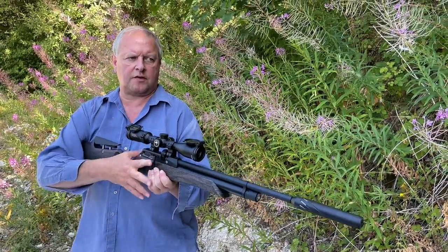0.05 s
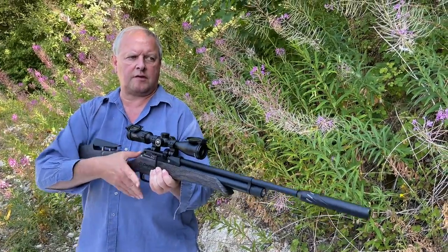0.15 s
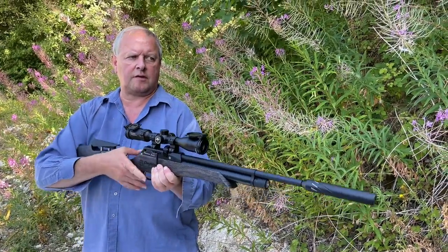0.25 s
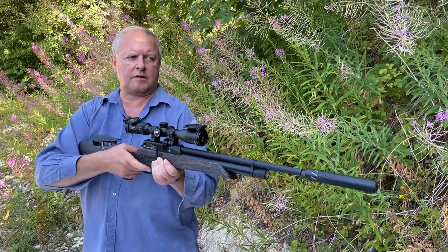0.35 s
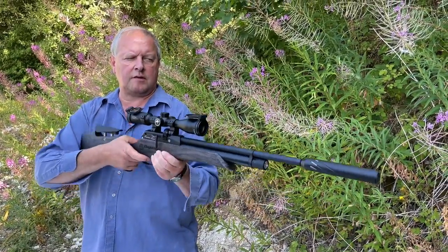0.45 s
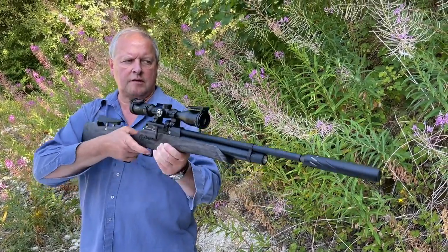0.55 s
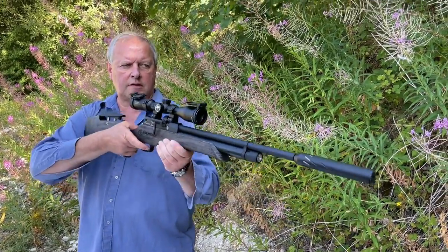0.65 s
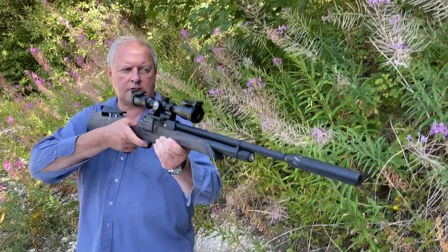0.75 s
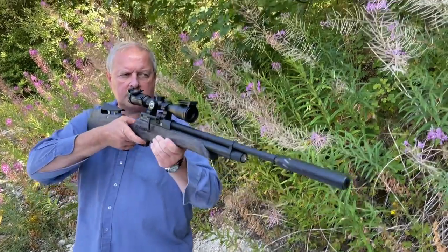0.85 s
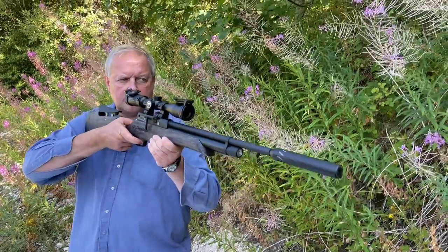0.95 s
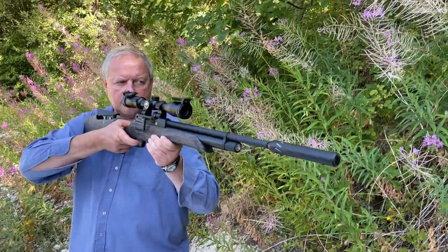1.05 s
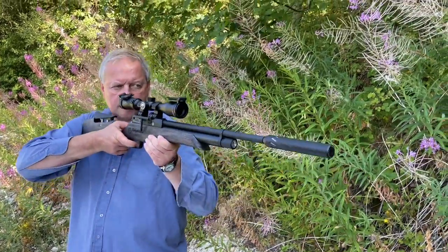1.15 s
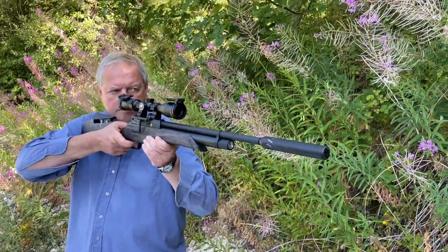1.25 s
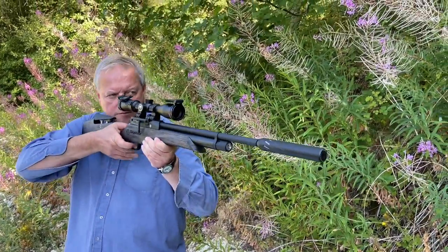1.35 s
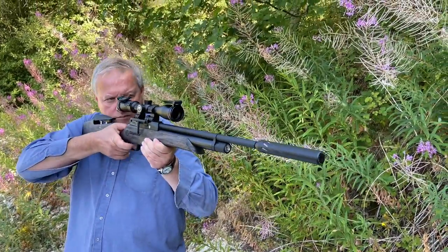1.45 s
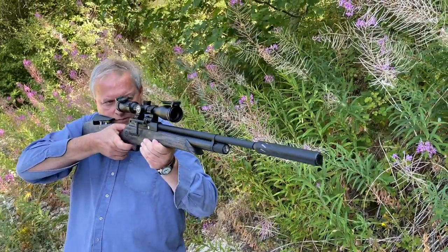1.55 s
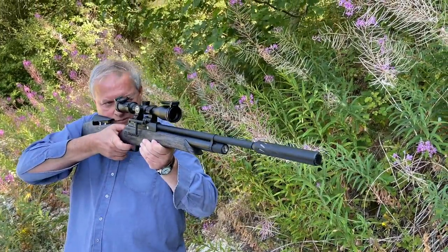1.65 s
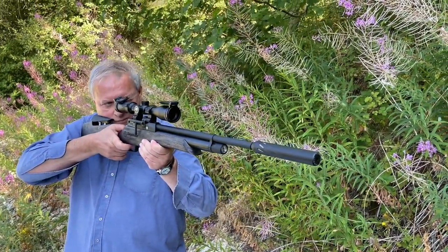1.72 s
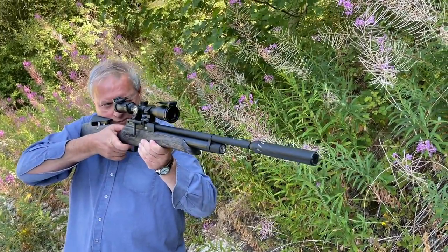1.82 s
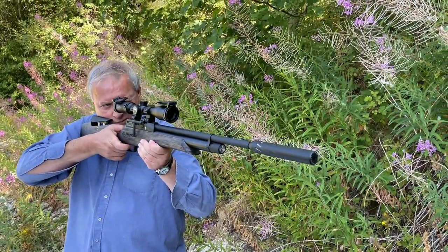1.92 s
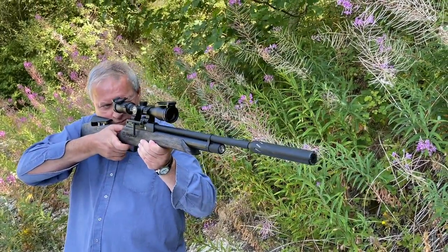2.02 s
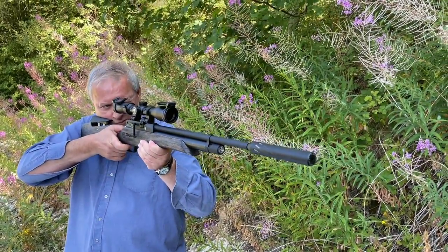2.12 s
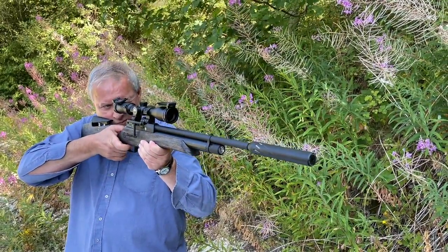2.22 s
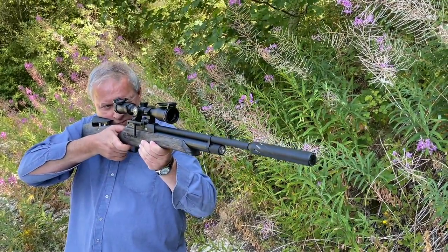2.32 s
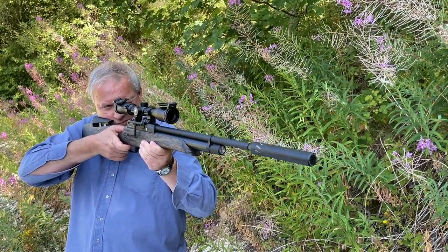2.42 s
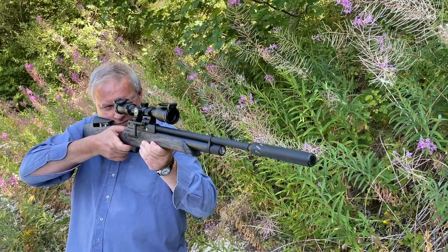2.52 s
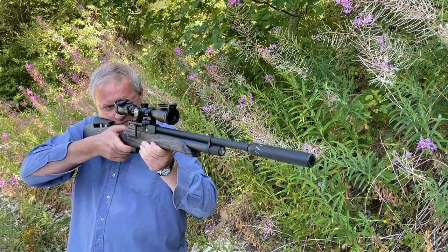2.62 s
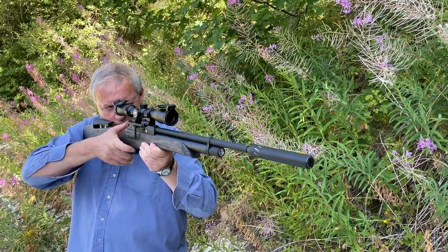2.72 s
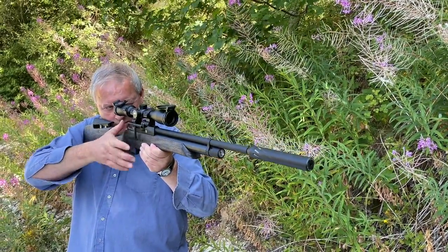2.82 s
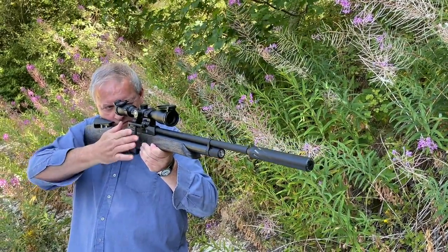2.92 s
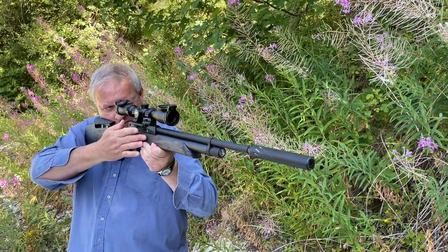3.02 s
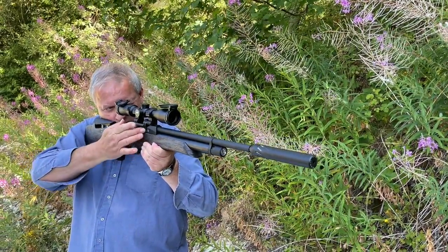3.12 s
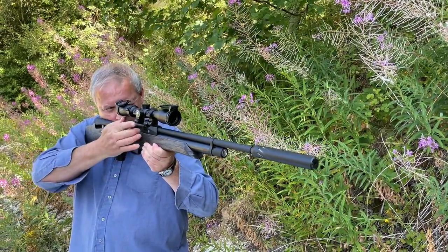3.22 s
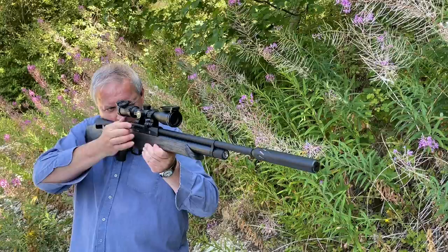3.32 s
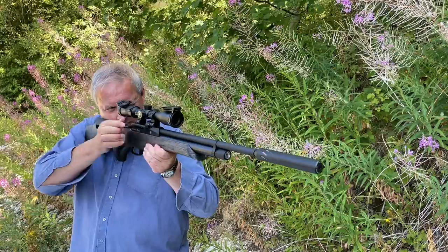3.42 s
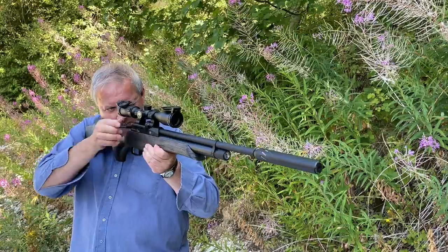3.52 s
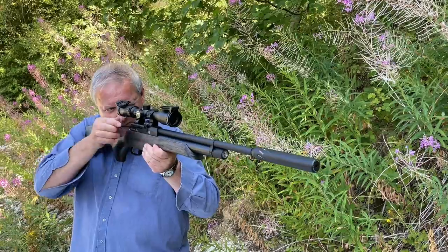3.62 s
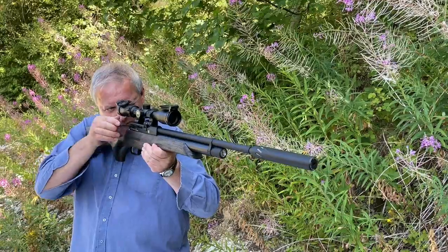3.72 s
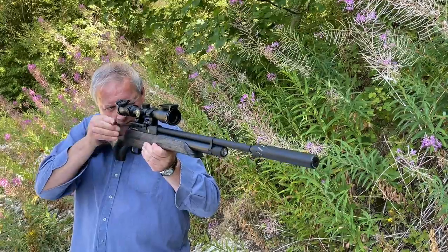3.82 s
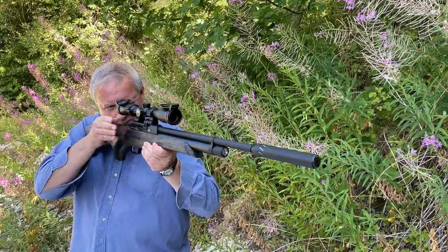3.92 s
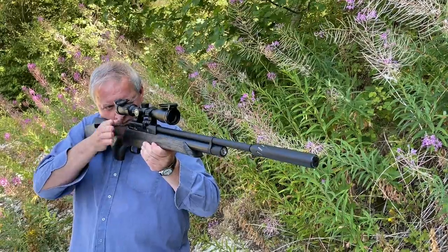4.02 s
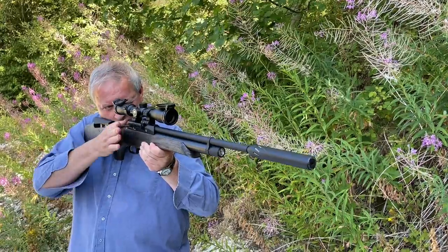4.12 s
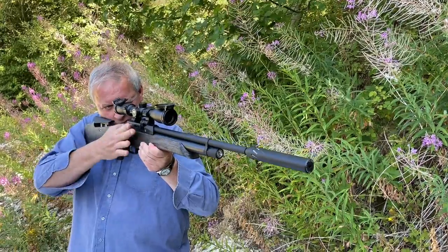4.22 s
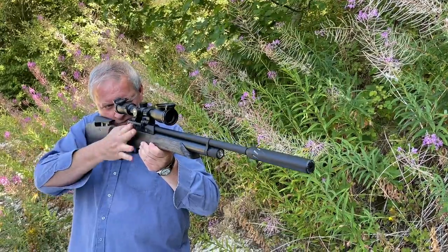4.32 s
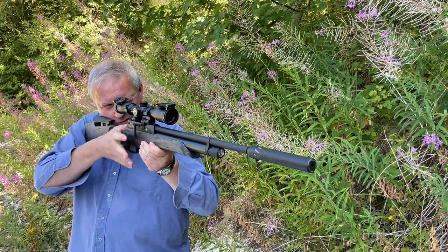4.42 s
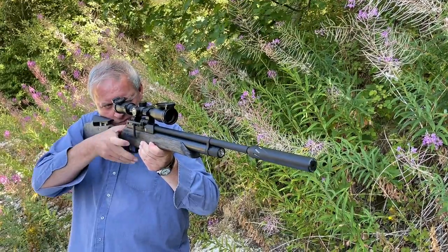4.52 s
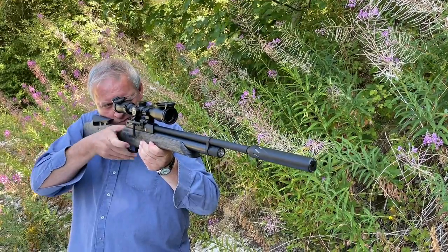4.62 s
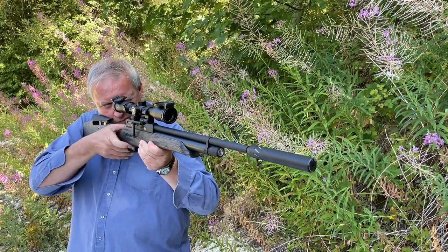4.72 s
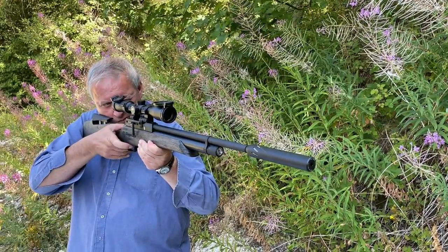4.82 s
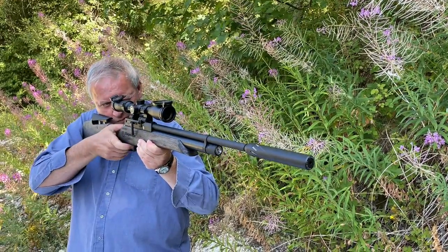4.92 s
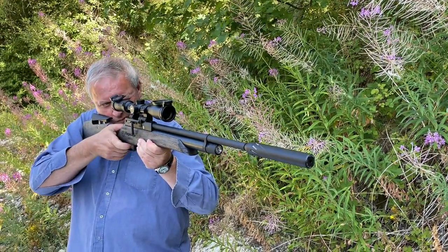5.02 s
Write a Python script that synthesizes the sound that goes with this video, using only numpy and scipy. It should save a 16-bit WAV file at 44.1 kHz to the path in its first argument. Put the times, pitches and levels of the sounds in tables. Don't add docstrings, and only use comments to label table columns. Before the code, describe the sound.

A hard steel clack opens, ringing briefly, then a dull bump and faint sleeve rustles as an air rifle is shouldered. After a quiet pause comes one very loud, overloaded burst of air with a short leafy echo. Then lever scrapes and sharp metallic knocks follow, ending in a firm snap. Close mono microphone outdoors, light wind rumble, hiss and a far engine hum.

```python
import sys
import numpy as np
from scipy import signal
from scipy.io import wavfile
from scipy.ndimage import uniform_filter1d

SR = 44100
rng = np.random.default_rng(int(sys.argv[2]) if len(sys.argv) > 2 else 0)


def output_pcm(signal):
    pcm = np.clip(np.atleast_2d(signal).T, -1, 1) * 32767
    wavfile.write(sys.argv[1], SR, np.round(pcm).astype(np.int16))


def nominal_scale(level):
    x = np.asarray(level, float) / 20
    return 10 ** x


N = 223099
T = np.arange(N) / SR


def rms_one(x):
    return x / np.sqrt(np.mean(x ** 2) + 1e-20)


def in_time(rows, silent_db=-110):
    s, level_db = np.transpose(rows)
    s = np.r_[s[0] - 0.04, s, s[-1] + 0.04]
    return np.interp(T, s, np.r_[silent_db, level_db, silent_db])


def at_hz(points, hz):
    points_hz, values = np.array(points).T
    return np.interp(np.log(hz), np.log(points_hz), values)


def band(x, low_hz, high_hz):
    sos = signal.butter(2, [low_hz, high_hz], "band", fs=SR, output="sos")
    return signal.sosfilt(sos, x + 1e-18)


def drift(rate_hz):
    r = np.exp(-80 * np.pi * rate_hz / SR)
    white = rng.standard_normal(N // 40 + 2002)
    slow = signal.lfilter([1], [1, -2 * r, r * r], white)[2000:]
    return np.interp(np.arange(N) / 40, np.arange(len(slow)), rms_one(slow))


def ring(force, hz, t60_s):
    r = nominal_scale(-60 / (t60_s * SR))
    w = 2 * np.pi * hz / SR
    return signal.lfilter([0, np.sin(w)], [1, -2 * r * np.cos(w), r * r], force + 1e-18)


def noise_bands(size):
    edges_hz = 20 * 2 ** np.arange(0, 10.1, 0.5)
    white = rng.standard_normal((2, size + 4000))
    out = []
    for k, (low_hz, high_hz) in enumerate(zip(edges_hz, edges_hz[1:])):
        noise = band(white[k % 2], low_hz, high_hz)[4000:]
        out.append((np.sqrt(low_hz * high_hz), noise))
    return out


def burst(after_s, rise_s, t60_s):
    return np.where(after_s < 0, np.exp(after_s / rise_s), nominal_scale(-60 * np.maximum(after_s, 0) / t60_s))


def coloured(colour_db, level_db, hard_db):
    return [level_db + db + hard_db * (part - 1) for part, db in enumerate(colour_db)]


# (frequency [Hz], level [dB])
AIR_COLOUR = [(100, 3), (250, 6), (500, 2.5), (1000, 2), (2000, -5), (4000, -8), (8000, -8.5), (16000, -14)]
# (frequency [Hz], density [dB per Hz])
WIND_COLOUR = [(20, 11.5), (34, -14.5), (50, -7), (70, -11.5), (100, -17), (140, -22), (200, -33),
               (400, -50)]
# (time [s], level [dB])
GUST = [(0.0, -52.5), (0.1, -47), (0.49, -47), (0.8, -43), (1.59, -48.5), (2.16, -46.5), (2.31, -48.5),
        (3.21, -48), (3.28, -47), (4.0, -49.5), (4.32, -45), (4.78, -50), (5.06, -51.5)]


def air():
    gust_db = in_time(GUST)
    hiss, wind, together = 0, 0, drift(5.3)
    for hz, noise in noise_bands(N):
        if hz > 100:
            hiss = hiss + noise * nominal_scale(at_hz(AIR_COLOUR, hz) + 0.32 * drift(3))
        if hz < 400:
            wind = wind + noise * nominal_scale(at_hz(WIND_COLOUR, hz) + 1.2 * together + 3 * drift(15))
    hum_hz, hum_width_hz, hum_db = 55, 18, -2
    hum = band(rng.standard_normal(N), hum_hz - hum_width_hz / 2, hum_hz + hum_width_hz / 2)
    hiss_db, wind_db = -65, -2.5
    return nominal_scale(hiss_db) * rms_one(hiss) + nominal_scale(gust_db + wind_db) * (rms_one(wind) + nominal_scale(hum_db) * rms_one(hum))


# (time [s], second order level [dB])
ENGINE_LOAD = [(0.0, -63.5), (0.31, -61.5), (0.45, -67.5), (0.97, -80), (1.38, -69), (2.1, -73),
               (2.24, -63.5), (2.93, -65), (3.04, -70), (3.8, -67.5), (4.06, -59.5), (4.42, -55.5),
               (4.8, -67.5), (5.06, -70)]


def engine():
    load_db = in_time(ENGINE_LOAD)
    swing_db = load_db - load_db.mean()
    phase = 2 * np.pi * np.cumsum(82.3 * (1 + 0.0022 * drift(1.0))) / SR
    out = 0
    # order, level at mean load [dB], share of the swing
    for order, db, follows in [(1, -67.5, 0.092), (2, -65, 0.98), (3, -72.5, 0.35)]:
        level_db = db + follows * swing_db + 0.83 * drift(0.97)
        out = out + np.sqrt(2) * nominal_scale(level_db) * np.sin(order * phase)
    return out


# (peak time [s], level [dB], brightness [dB], swell [s], fade [s])
SLEEVE_RUBS = [
    (0.501, -71.5, -1, 0.093, 0.14),
    (0.65, -59, -2, 0.046, 0.041),
    (0.93, -70, -12, 0.094, 0.085),
    (1.06, -62.5, -14, 0.036, 0.042),
]


def sleeves():
    dull, bright = 0, 0
    for s, db, bright_db, swell_s, fade_s in SLEEVE_RUBS:
        rub = nominal_scale(db) * np.exp(-((T - s) / np.where(T < s, swell_s, fade_s)) ** 2)
        dull = dull + rub
        bright = bright + rub * nominal_scale(bright_db)
    noise = rng.standard_normal((2, N)) * nominal_scale(1.05 * drift(60))
    return dull * rms_one(band(noise[0], 900, 3500)) + bright * rms_one(band(noise[1], 5600, 11500))


# (time [s], peak [dB], pitch [Hz])
BUMPS = [
    (0.211, -40, 113.3),
    (0.899, -50.5, 98.8),
    (1.49, -46, 110.8),
    (3.511, -57.5, 454),
    (3.548, -37, 100.9),
]


def bumps():
    return sum(nominal_scale(db) * np.exp(-((T - s) / 0.007) ** 2) * np.sin(2 * np.pi * hz * (T - s))
               for s, db, hz in BUMPS)


# (time [s], level [dB], lowest mode share [dB])
STOCK_BLOWS = [
    (0.003, -35, -1),
    (3.447, -42, -19),
    (3.647, -35.5, -12.5),
    (3.862, -41, -22),
    (3.872, -43.5, -22),
    (3.923, -57.5, -22),
    (4.233, -36, -8.5),
]
# (frequency [Hz], level [dB], t60 [s])
STOCK_MODES = [(373, 6.5, 0.11), (500, -5.5, 0.025), (665, 7, 0.02), (740, 3, 0.06), (1049, 2.5, .07),
               (1588, -1.5, 0.083), (2850, 0, .06)]


def stock():
    force = np.zeros((2, N))
    for s, db, low_db in STOCK_BLOWS:
        force[:, round(s * SR)] = nominal_scale(db + low_db), nominal_scale(db)
    force[1] = band(force[1], 330, 5000)
    return sum(nominal_scale(db) * ring(force[int(k > 0)], hz, t60_s)
               for k, (hz, db, t60_s) in enumerate(STOCK_MODES))


# (time [s], level [dB])
TUBE_BLOWS = [
    (0.003, -37),
    (0.047, -39.5),
    (0.066, -49),
    (0.112, -57.5),
]
# (frequency [Hz], level [dB], t60 [s])
TUBE_MODES = [(800, -7, .07), (1600, -1, .09), (3390, -8, .05), (4810, -4, .03), (5250, -4, .03)]


def tube():
    force = np.zeros((len(TUBE_MODES), N))
    signs = rng.choice([-1, 1], (len(TUBE_MODES), len(TUBE_BLOWS)))
    at = [round(s * SR) for s, db in TUBE_BLOWS]
    force[:, at] = nominal_scale([db for s, db in TUBE_BLOWS]) * signs
    return sum(nominal_scale(db) * ring(f, hz, t60_s) for f, (hz, db, t60_s) in zip(force, TUBE_MODES))


# (frequency [Hz], level [dB], t60 [s])
ACTION_MODES = [(1300, 0, .015), (1620, 5, .02), (1850, 4, .015), (2780, 0, .01), (3280, 1, .008),
                (4400, -1, .008), (4900, 0, .012), (5570, 0, .01), (6300, -2, .008), (7900, 0, .008),
                (8800, 0, .012), (9700, 0, .008), (10400, -6, .008), (13400, -4, .008)]
PART_EDGES_HZ = [1120, 2200, 7000, 11500, 15500]


def steel(force, part, crack_db, strengths):
    low_hz, high_hz = PART_EDGES_HZ[part:part + 2]
    out = nominal_scale(crack_db) * force
    for (hz, level_db, t60_s), strength in zip(ACTION_MODES, strengths):
        if low_hz <= hz < high_hz:
            out = out + nominal_scale(level_db) * ring(force * strength, hz, t60_s) / np.sqrt(t60_s * SR / 28)
    return band(band(out, low_hz, high_hz), 0.8 * low_hz, 1.2 * high_hz)


# (time [s], level [dB], hardness [dB per
# part], rattle [ms])
STEEL_KNOCKS = [(0.0, -32.5, 1.5, 2.9), (0.0026, -17, 5, 15.6), (3.4278, -43.5, 2.5, 10), (3.431, -50, 2, 44),
                (3.4452, -31, -3.5, 16.7), (3.4525, -47.5, 7.5, 26), (3.6182, -30.5, 5, 24), (3.6346, -26, 8, 11),
                (3.638, -37.5, 13.5, 7.6), (3.6433, -36.5, 7.5, 27), (3.6468, -34.5, -9, 8.8), (3.655, -64, 0, 21),
                (3.8562, -39, -1.5, 12), (3.861, -31, 0.5, 20), (3.87, -65, -11, 16), (4.232, -19, 6.5, 15.6),
                (4.24, -35, 10, 17), (4.252, -48, 12, 13),
                (0.14, -69.5, 12.5, 9.8), (1.68, -81.5, 3, 12), (3.119, -55, 2, 6.2), (3.207, -63.5, -10, 14),
         (3.212, -59, 0, 10), (3.232, -48, 1.5, 5), (3.587, -61, 10, 9.4), (3.607, -53, 10, 21),
         (3.922, -49, -1, 20), (3.9485, -53.5, 1, 15), (3.981, -47, 9, 6.7), (3.984, -55, 1, 25),
         (3.996, -61, 11.5, 20), (4.016, -48.5, -1, 40), (4.048, -62, 4, 14), (4.069, -49.5, 1.5, 15),
         (4.076, -51, 4, 12), (4.102, -55.5, -1, 10), (4.68, -73, 10, 14)]
# (time [s], level [dB], hardness [dB per part], rattle [ms])
CATCH = [
    (1.1492, -54.5, 7, 5.6),
    (4.85, -70, 0, 14),
]
# (dull, middle, bright, top [dB])
KNOCK_COLOUR_DB = (-1.5, 1.5, -6, -22.5)
# (dull, middle, bright, top [dB])
CATCH_COLOUR_DB = (-19, 3.5, -27, -25)


def knocks():
    out, after_s = np.zeros(N + 3000), np.arange(3000) / SR
    rows = [(*row, KNOCK_COLOUR_DB) for row in STEEL_KNOCKS]
    rows += [(*row, CATCH_COLOUR_DB) for row in CATCH]
    rattle = rng.standard_normal((len(rows), 4, len(after_s)))
    mode_spread_db, catch_hz, catch_fall_db_per_octave = 3, 4650, 25
    strengths = nominal_scale(mode_spread_db * rng.standard_normal((len(rows), len(ACTION_MODES))))
    octaves_off = np.abs(np.log2(np.array(ACTION_MODES)[:, 0] / catch_hz))
    strengths[-len(CATCH):] = nominal_scale(8 - catch_fall_db_per_octave * octaves_off)
    for (s, level_db, hard_db, length_ms, colour_db), noise, strength in zip(rows, rattle, strengths):
        shape = burst(after_s - 0.0008, 0.0003, 1.9 * max(length_ms, 2) / 1000)
        shape = shape + 0.45 * burst(after_s - 0.001, 0.00018, 0.005)
        at = max(round(s * SR), 0)
        for part, db in enumerate(coloured(colour_db, level_db, hard_db)):
            sound = steel(noise[part] * shape, part, 14, strength)
            first_5ms_rms = np.sqrt(np.mean(sound[:220] ** 2))
            out[at:at + len(after_s)] += nominal_scale(db) * sound / first_5ms_rms
    return out[:N]


# (start [s], end [s], start level [dB], end level [dB], hardness [dB per part])
STROKES = [(3.073, 3.117, -73, -57.5, 0), (3.126, 3.146, -64, -58.5, 6), (3.198, 3.24, -71, -65, 2),
           (3.232, 3.298, -58, -81, -8), (3.301, 3.345, -71, -54, -4), (3.349, 3.38, -56.5, -48, 5),
           (3.382, 3.431, -56.5, -51, 1), (3.556, 3.589, -69.5, -53, -11), (3.582, 3.628, -58, -51.5, -8),
           (3.9, 3.916, -71, -64, 16), (3.96, 3.988, -65, -64, 6), (4.009, 4.07, -64, -57.5, -2.5),
           (4.078, 4.13, -56.5, -59, 6.5), (4.131, 4.193, -54, -65.5, 5), (4.191, 4.229, -62.5, -64, -3)]


def slide():
    colour_db, edge_s = (-2, -0.5, -11.5), 0.012
    levels = np.zeros((3, N))
    for start, end, start_db, end_db, hard_db in STROKES:
        touch = np.clip(np.minimum(T - start, end - T) / edge_s + 0.5, 0, 1)
        level_db = np.interp(T, [start, end], [start_db, end_db])
        levels += touch * nominal_scale(np.array(coloured(colour_db, level_db, hard_db)))
    grains = rng.standard_normal((3, N)) * nominal_scale(2.0 * drift(148))
    swells = [nominal_scale(4 * np.clip(drift(30), -2, 1.5)) for mode in ACTION_MODES]
    return sum(level * rms_one(steel(grains[part], part, 12, swells)) for part, level in enumerate(levels))


# (time [s], level [dB])
SPRING_KICKS = [
    (3.428, -30),
    (3.447, -36),
    (3.606, -52),
    (3.618, -32),
    (3.982, -37.5),
    (4.070, -47),
]
# (start [s], end [s], level [dB])
SPRING_SING = [
    (3.342, 3.45, -46),
    (3.98, 4.145, -42),
]


def spring(rubbing):
    kicks = sum(nominal_scale(db - 28.5) * burst(T - s, 0.00025, 0.0076) for s, db in SPRING_KICKS)
    force = kicks * rng.standard_normal(N)
    stretch = sum(nominal_scale(db) * (T > start) * (T < end) for start, end, db in SPRING_SING)
    force = force + stretch * uniform_filter1d(np.abs(rubbing), size=200) * rng.standard_normal(N)
    return 2 * ring(force, 10900, 0.072)


def leaves(x):
    level_db, t60_s, build_s = -16, 0.18, 0.0043
    white = np.resize(rng.standard_normal(SR // 2), N)
    edges_hz = 800 * 2 ** np.arange(0, 4.1, 0.5)
    linger, build = nominal_scale(-120 / (t60_s * SR)), np.exp(-1 / (build_s * SR))
    out = np.zeros(N)
    for k, (low_hz, high_hz) in enumerate(zip(edges_hz, edges_hz[1:])):
        power = signal.lfilter([1 - linger], [1, -linger], band(x, low_hz, high_hz) ** 2)
        power = signal.lfilter([1 - build], [1, -build], power)
        out += np.sqrt(np.abs(power)) * rms_one(band(np.roll(white, 999 * k), low_hz, high_hz))
    return nominal_scale(level_db) * out


def push(t):
    half_s = 0.95e-3 * 1.5 ** np.arange(3)
    starts = 2.3876 + np.cumsum(half_s) - half_s
    return sum(-3.5 * (-0.15) ** k * np.sin(np.pi * np.clip((t - starts[k]) / half_s[k], 0, 1)) ** 2
               for k in range(3))


# (frequency [Hz], level [dB], t60 [s])
THUMP_MODES = [(108, -19, .12), (224, -22, 0.092), (380, -23, 0.04)]


def thump(size, at):
    click = 1.0 * (np.arange(size) == at)
    return -sum(nominal_scale(db) * ring(click, hz, t60_s) for hz, db, t60_s in THUMP_MODES)


# (time [s], peak [dB], rise [ms], t60 [ms], brightness
# [dB per octave])
BLAST = [
    (2.3842, -3, 0.81, 180, 0),
    (2.3868, 11.5, .3, 39, 0.5),
    (2.3892, 18.5, .5, 17.5, -2.5),
    (2.3922, 18, 0.57, 13.3, 3),
    (2.3965, -8.5, .5, 37, -1),
    (2.4015, -1, 0.43, 7.2, 1.5),
    (2.404, -8, .5, 15, -0.5),
    (2.4134, 7, .25, 5.3, 17.5),
    (2.4145, 1.5, .25, 5.2, 13),
    (2.4190, 0.5, .5, 4.4, -1),
]
# (frequency [Hz], density [dB per Hz])
BLAST_COLOUR = [(88, -42), (150, -23.5), (1060, -10), (1900, -2), (2220, -7), (3920, -6), (5360, -2),
                (6510, -6.5), (9440, -4), (16000, -21)]
# (frequency [Hz], density [dB per Hz])
ECHO_COLOUR = [(35, -39.5), (60, -11), (118, -21), (579, -17.5), (968, -21), (1660, -13), (3120, -5.5),
               (3340, -15.5), (8920, 1.5), (14600, -8), (16000, -14.5)]
# (frequency [Hz], t60 [s])
ECHO_T60 = [(70, 0.11), (250, 0.1), (700, .1), (1400, 0.23), (2700, 0.11), (5500, 0.34), (11000, .21)]
# (time [s], level [dB], t60 [s], dullness [dB per octave])
LATE = [
    (2.448, -42.5, 0.27, 1),
    (2.531, -58.5, 0.045, 6),
    (2.555, -67, 0.087, 2),
    (2.582, -55.5, 0.11, 3.5),
    (2.62, -58, 0.16, 1),
    (2.67, -65, 0.25, 0),
    (2.735, -62.5, 0.3, 1),
]
# (frequency [Hz], density [dB per Hz])
FAR_COLOUR = [(290, -47), (500, -8), (849, 0), (1360, -8.5), (1710, -4.5), (2450, 2), (9340, -3),
              (14000, -16.5)]


def shot():
    shot_s, lead_s, size = 2.3875, 0.05, SR
    echo_db, echo_top_s, echo_rise_s = -15.5, 2.4117, 0.05
    start = round((shot_s - lead_s) * SR)
    t, noises = T[start:start + size], noise_bands(size)

    def share(colour, hz):
        power = sum(nominal_scale(2 * at_hz(colour, f)) * np.mean(n ** 2) for f, n in noises)
        return nominal_scale(at_hz(colour, hz)) / np.sqrt(power)

    fired = burst(t - shot_s, 0.0005, 1e3)
    returns = [(fired * nominal_scale(db) * burst(t - s, 0.004, t60_s), dull_db) for s, db, t60_s, dull_db in LATE]
    out = np.zeros(size)
    for hz, noise in noises:
        tilt = min(np.log2(hz / 7000), 0)
        jet = sum(nominal_scale(db - 13.5 + bright_db * tilt) * burst(t - s, rise_ms / 1000, t60_ms / 1000)
                  for s, db, rise_ms, t60_ms, bright_db in BLAST)
        echo = fired * nominal_scale(echo_db) * burst(t - echo_top_s, echo_rise_s, at_hz(ECHO_T60, hz))
        late = sum(shape * nominal_scale(-dull_db * np.log2(hz / 3000)) for shape, dull_db in returns)
        out += noise * (jet * share(BLAST_COLOUR, hz) + echo * share(ECHO_COLOUR, hz)
                        + late * share(FAR_COLOUR, hz))
    out = out + push(t) + thump(size, round(lead_s * SR))
    return np.pad(out, (start, N - start - size))


def scene():
    rubbing = slide()
    rifle = knocks() + stock() + tube() + rubbing + spring(rubbing)
    mix = air() + engine() + sleeves() + bumps() + rifle + leaves(rifle) + shot()
    return mix[None]


def roll_off(x):
    return signal.sosfilt(signal.butter(12, 16640, fs=SR, output="sos"), x)


def record(dry):
    loud = np.clip(dry - 0.0018, -1.3, 1.3)
    low_pass = signal.cheby2(20, 40, 16100, fs=SR, output="sos")
    mix = signal.sosfilt(low_pass, loud)
    return roll_off(mix)


dry = scene()
out = record(dry)
output_pcm(out)
```